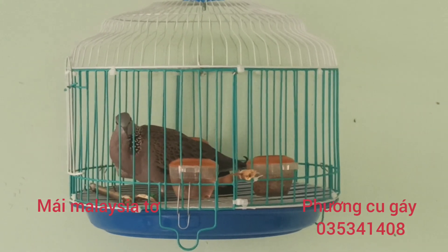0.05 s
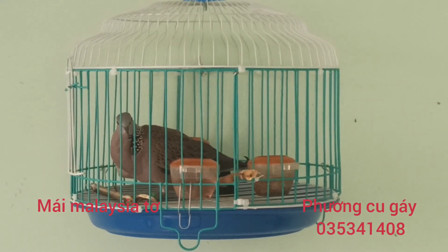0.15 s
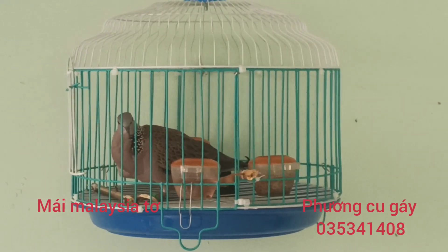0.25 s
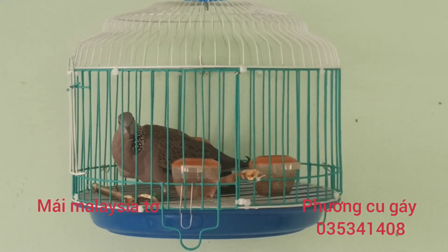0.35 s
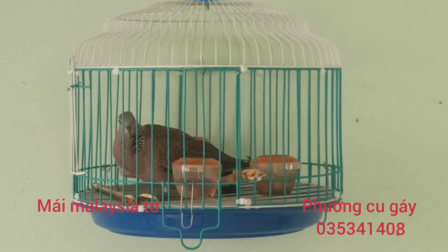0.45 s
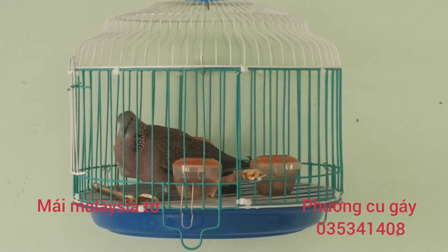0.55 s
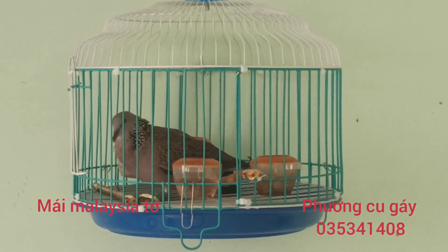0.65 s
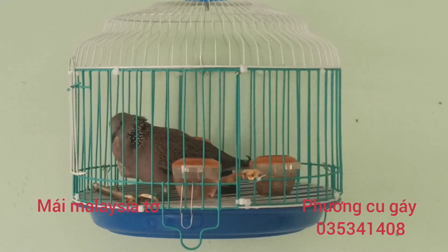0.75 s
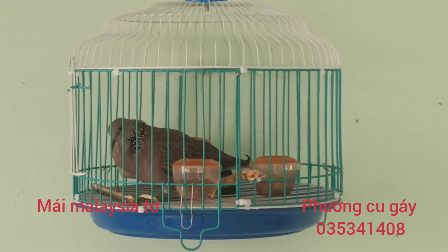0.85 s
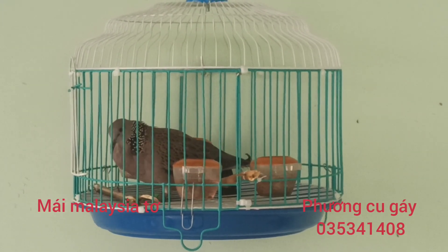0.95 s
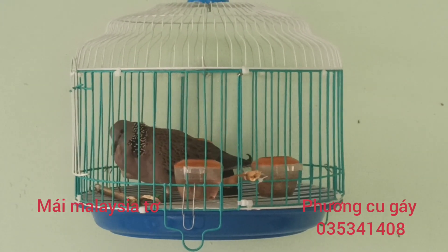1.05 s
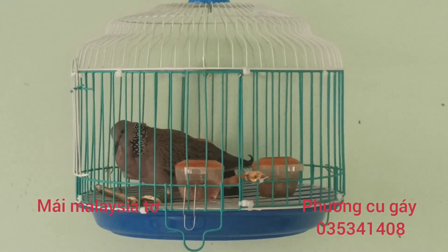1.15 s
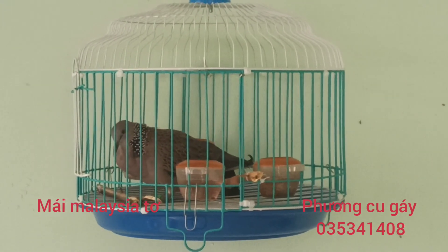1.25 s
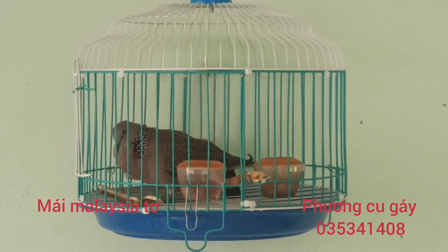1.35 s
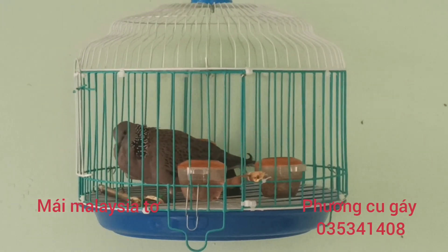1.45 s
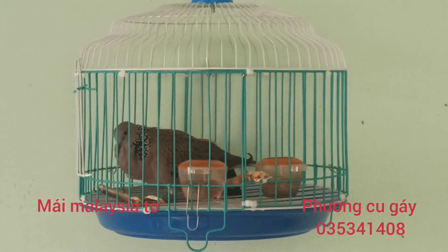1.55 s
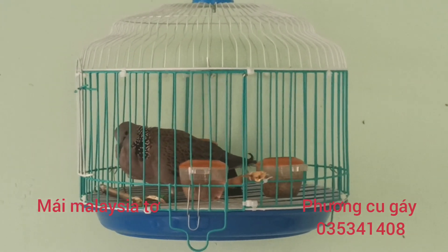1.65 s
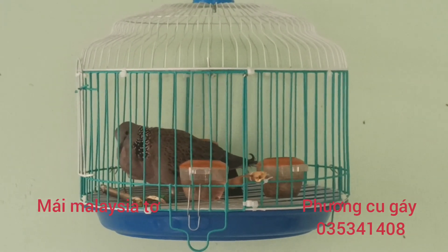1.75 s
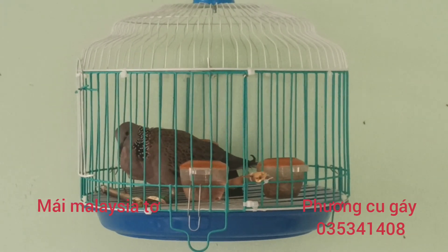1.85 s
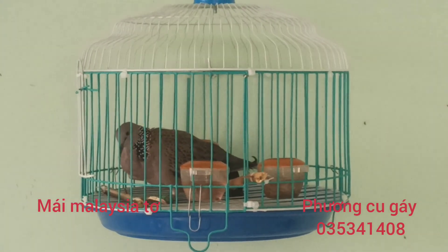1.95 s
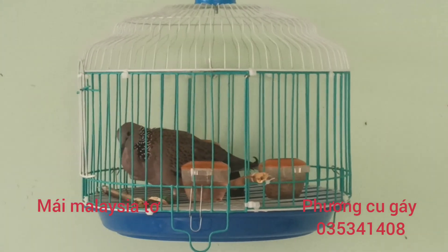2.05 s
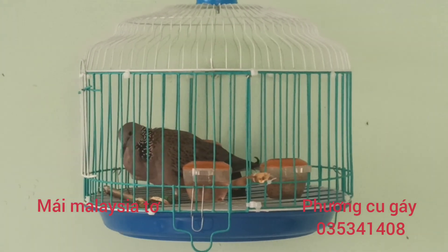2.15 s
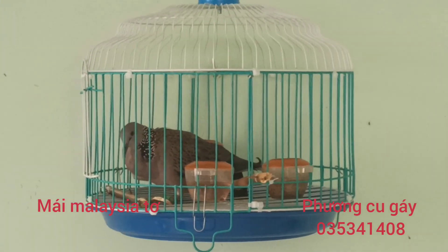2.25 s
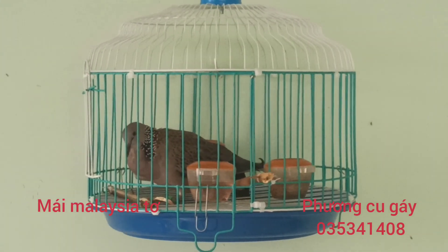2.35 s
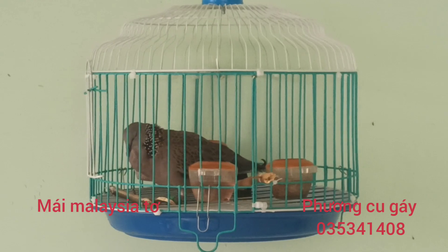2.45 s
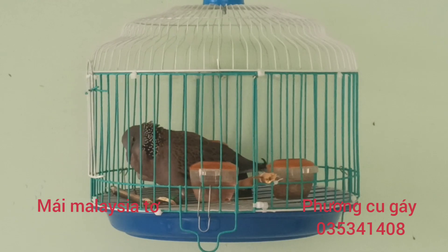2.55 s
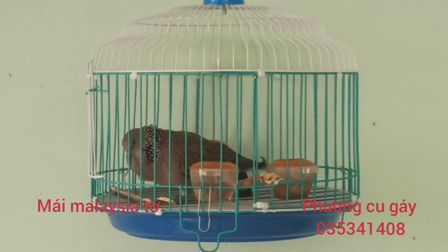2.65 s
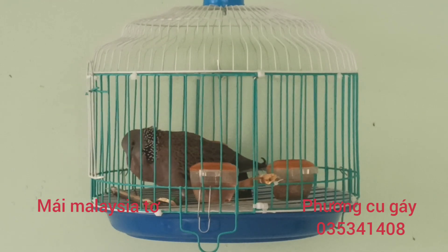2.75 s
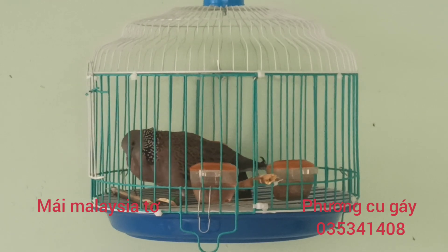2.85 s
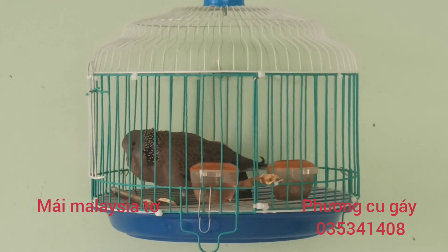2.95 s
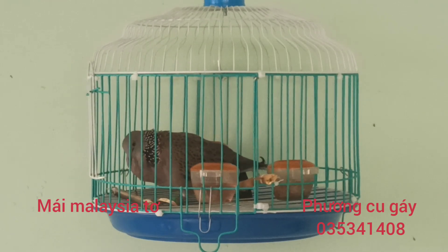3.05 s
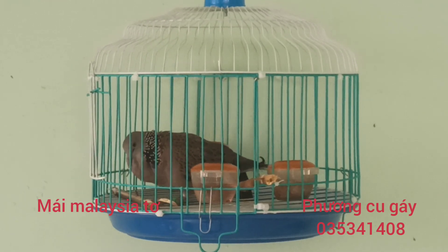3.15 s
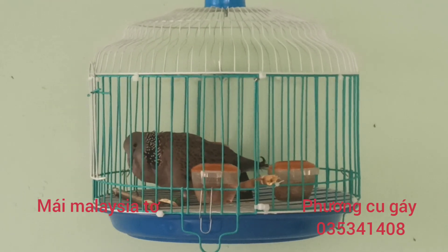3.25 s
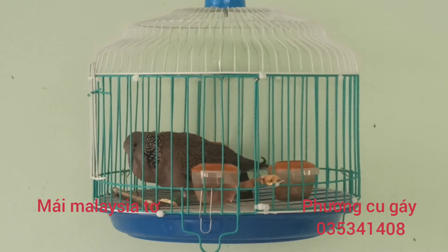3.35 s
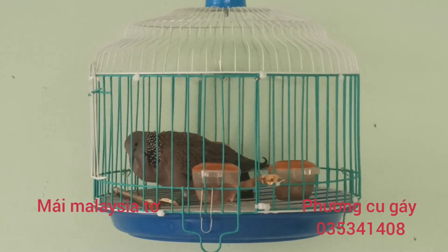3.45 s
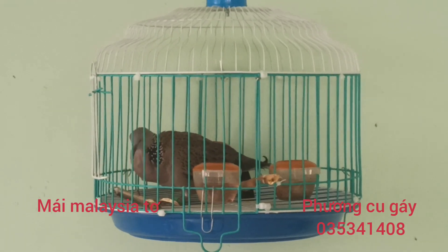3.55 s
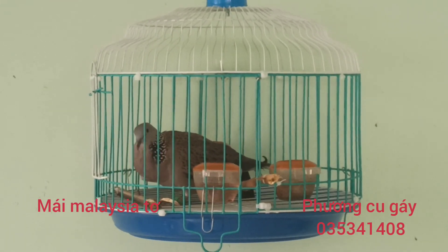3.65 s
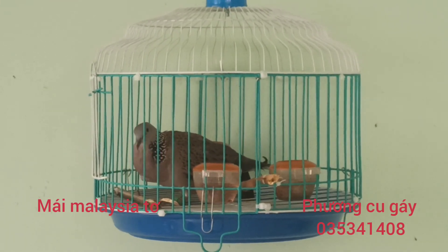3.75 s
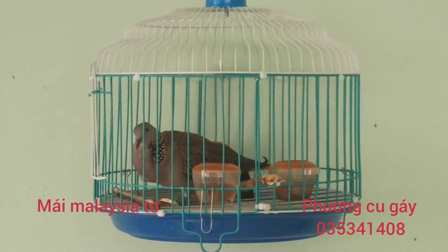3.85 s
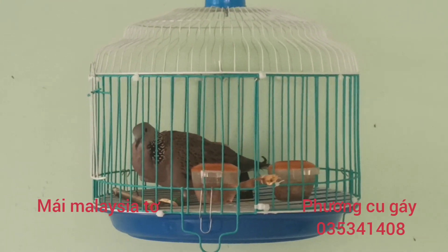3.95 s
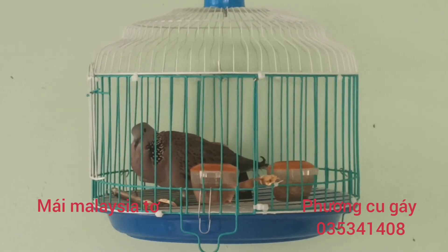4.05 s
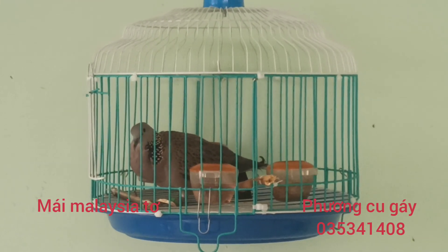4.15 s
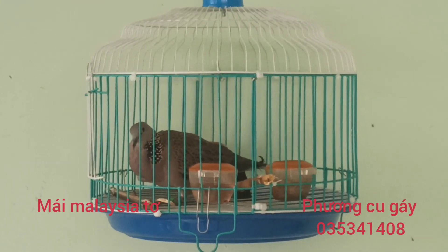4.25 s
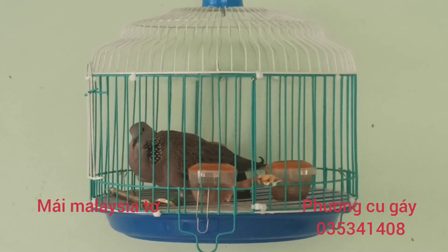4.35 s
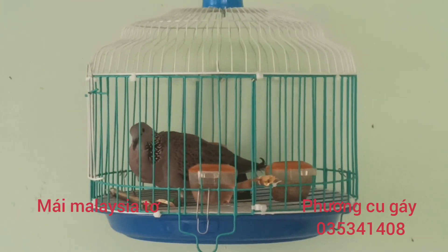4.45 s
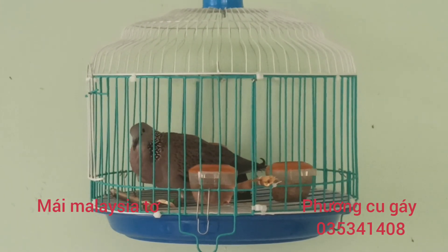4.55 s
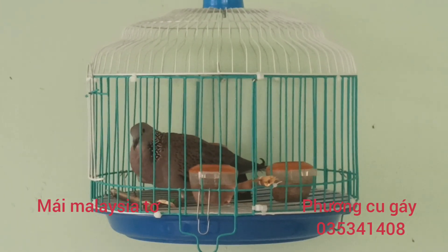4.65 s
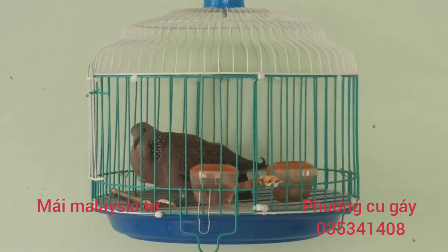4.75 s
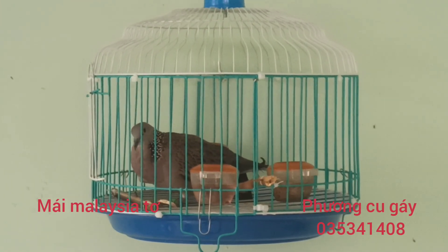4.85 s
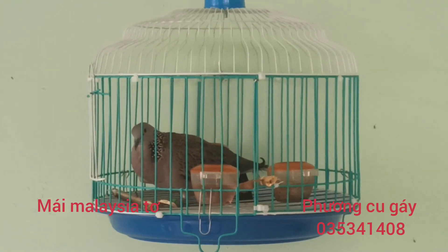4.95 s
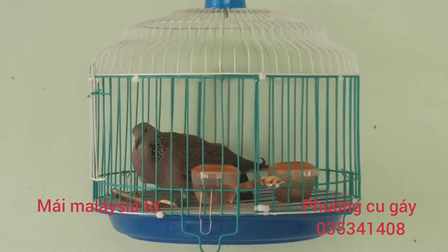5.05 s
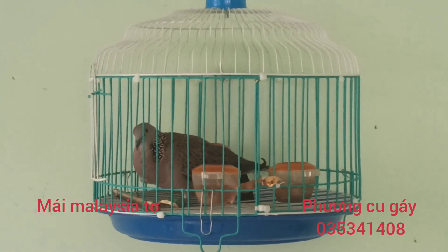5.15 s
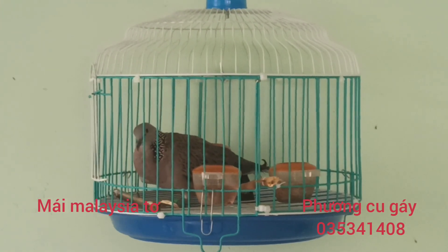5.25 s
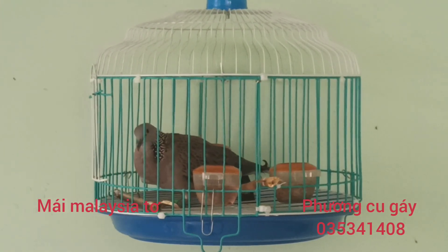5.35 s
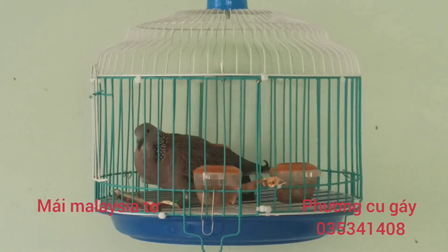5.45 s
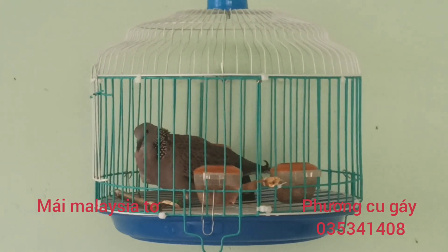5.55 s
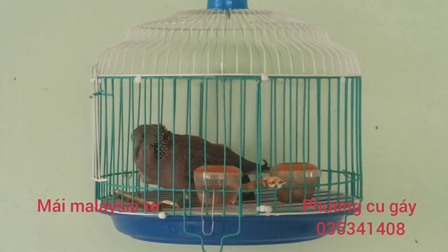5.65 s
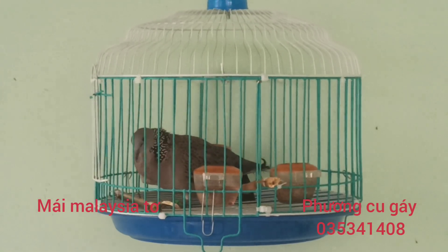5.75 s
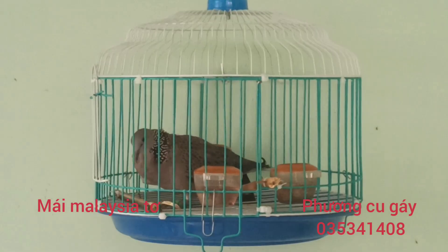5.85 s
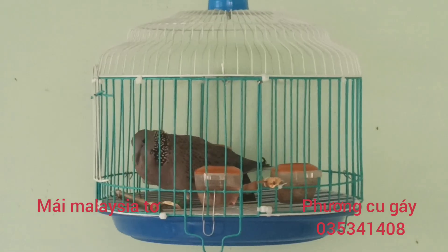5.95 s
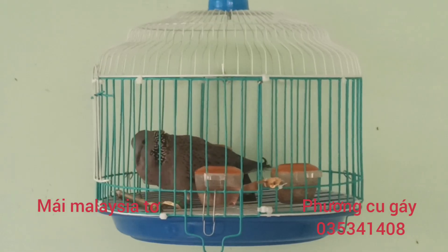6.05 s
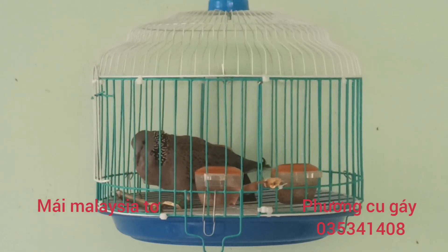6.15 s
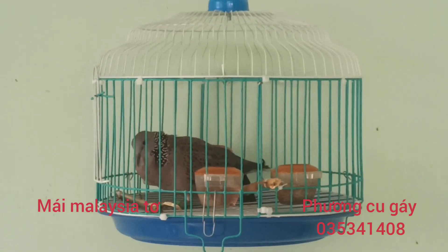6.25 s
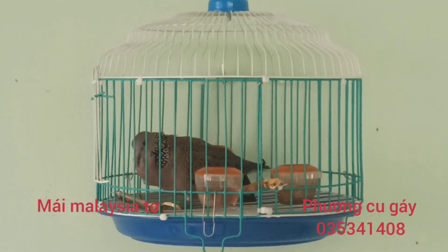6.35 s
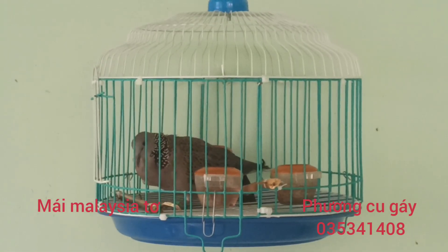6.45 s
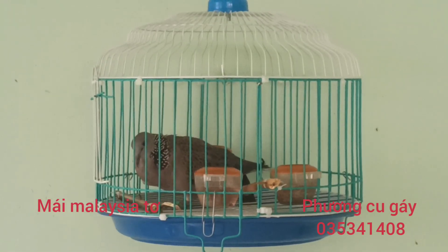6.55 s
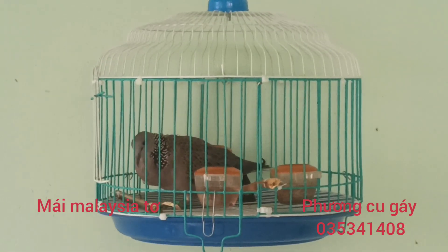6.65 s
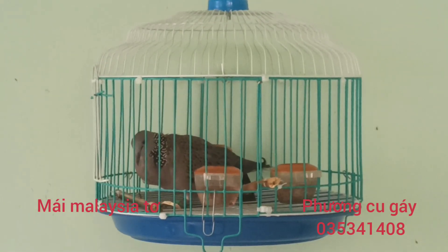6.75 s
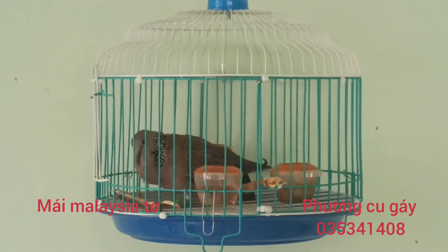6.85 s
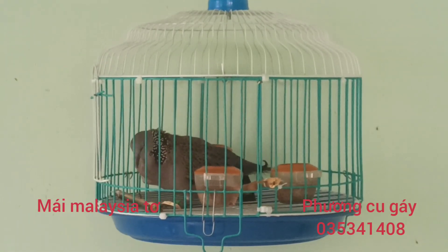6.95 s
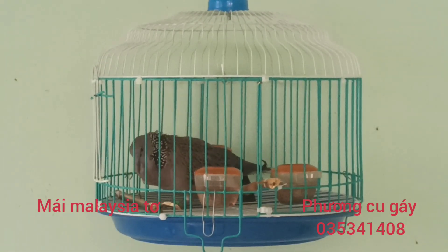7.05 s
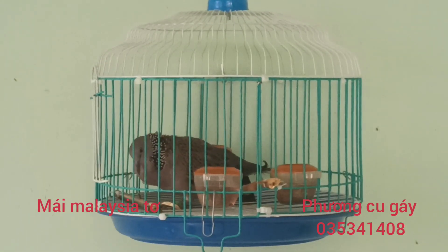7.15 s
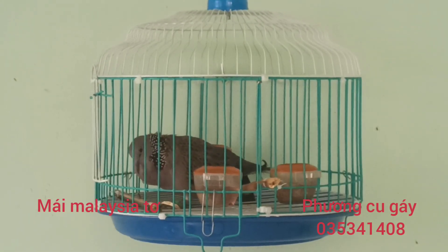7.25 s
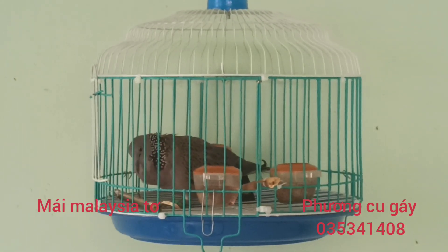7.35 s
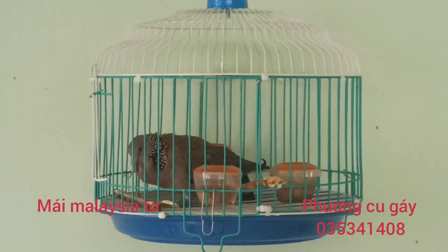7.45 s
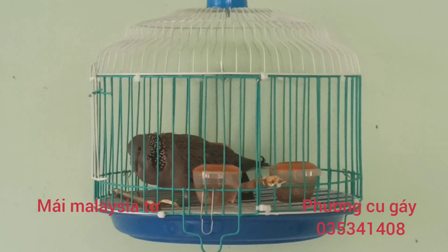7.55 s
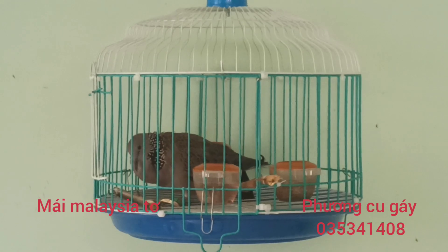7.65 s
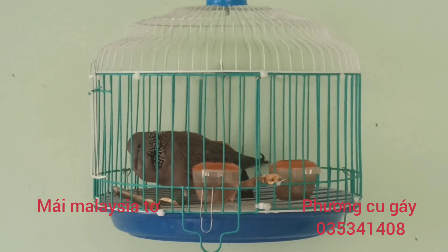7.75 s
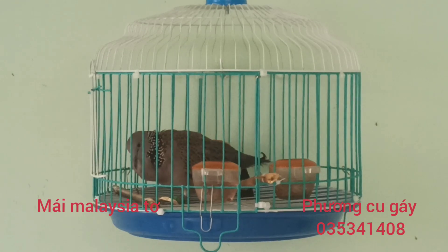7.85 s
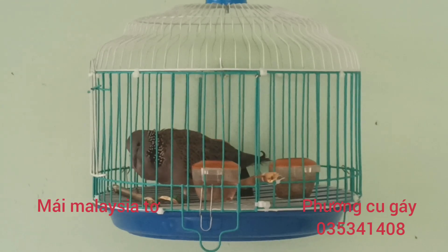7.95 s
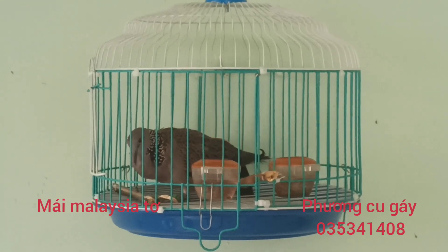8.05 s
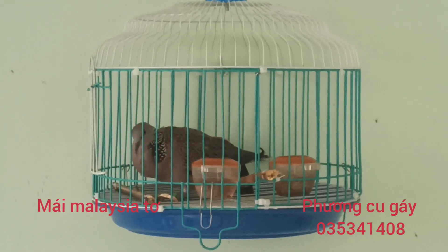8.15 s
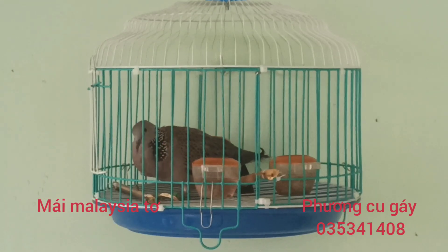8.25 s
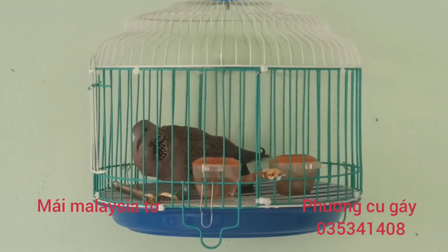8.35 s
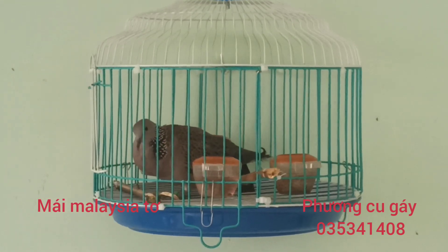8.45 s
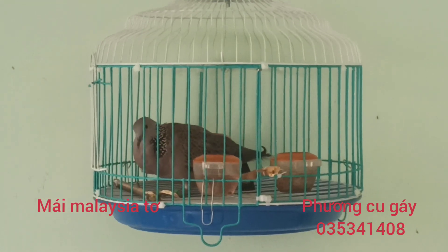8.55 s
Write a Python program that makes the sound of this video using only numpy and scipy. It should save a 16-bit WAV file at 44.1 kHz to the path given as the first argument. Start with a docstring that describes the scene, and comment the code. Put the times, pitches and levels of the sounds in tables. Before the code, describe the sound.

A spotted dove in a wire cage coos four phrases in a bare, quiet room. Each begins with a short plain note, then longer, rapidly fluttering notes that swell and sag. The second ends in a softer, reedier moan. Walls ring briefly after each note. Between calls there are low rumble, faint hiss, soft rustling and a few light ticks on the cage, picked up by a slightly dull microphone.

```python
"""In a bare, quiet room, a caged spotted dove coos four phrases: a short clear note, then longer rolling ones.
Each coo is an almost pure tone that flutters in the syrinx (the bird's voice organ), plus weak overtones and rasp.
One phrase ends in a softer, reedy moan. Faint whistles, a far note and light ticks on the cage are mixed in.
The walls ring on after every note, over a low room rumble, faint hiss and soft rustling made of shaped noise."""
import sys
import numpy as np
from scipy import signal
from scipy.fft import rfft, irfft, next_fast_len
from scipy.io import wavfile
from scipy.ndimage import uniform_filter1d, map_coordinates

SR = 44100
rng = np.random.default_rng(int(sys.argv[2]) if len(sys.argv) > 2 else 0)


def inscribe(sig):
    """Save sig as 16-bit PCM at rate SR to the path in sys.argv[1].

    A 1-D sig is mono; a 2-D sig holds one channel per row.
    Samples are clipped to [-1, 1] before scaling.
    """
    pcm = np.round(np.clip(np.atleast_2d(sig).T, -1, 1) * 32767)
    wavfile.write(sys.argv[1], SR, pcm.astype(np.int16))


N = 378819


def amp(db):
    """Turn decibels into gain."""
    return 10 ** (np.asarray(db) / 20)


def unit(x):
    """Scale x to an rms (average strength) of 1."""
    return x / np.sqrt(np.mean(x ** 2) + 1e-20)


def along(points, hz):
    """Read a curve of (Hz, value) points at any frequency, joining them on a log axis."""
    point_hz, value = np.transpose(points)
    return np.interp(np.log(hz + 1), np.log(point_hz + 1), value)


def wobble(rate):
    """A smooth random curve around 0, with this many random points a second."""
    points = rng.standard_normal(int(N * rate / SR) + 4)
    return map_coordinates(points, [np.arange(N) * rate / SR])


def filtered(x, response):
    """Make each frequency of x louder or softer by response(hz)."""
    size = next_fast_len(N + SR // 2)
    hz = np.fft.rfftfreq(size, 1 / SR)
    return irfft(rfft(x, size) * response(hz), size)[..., :N]


def noise(spectrum):
    """Random noise coloured by a spectrum, at rms 1."""
    white = rng.standard_normal(N)
    return unit(filtered(white, lambda hz: amp(along(spectrum, hz))))


def swells(rows, fall_db_per_s):
    """Gain of a row of noise swells that rise, hold and die away; their powers add."""
    t = np.arange(N) / SR
    power = np.zeros(N)
    for start, rise, hold, level_db in rows:
        before = np.maximum(start - t, 0)
        after = np.maximum(t - start - hold, 0)
        drop_db = 10 * before / rise + fall_db_per_s * after
        near = drop_db < 60  # leave out what is too faint to matter
        power[near] += amp(level_db - drop_db[near]) ** 2
    return np.sqrt(power)


# colour of the low rumble: pitch_hz, relative level_db (per Hz)
RUMBLE_COLOUR = [(20, -57), (35, -31), (50, -22), (90, -3), (125, 1), (200, -1), (300, -3), (500, -7),
                 (800, -12.5), (1400, -32), (3000, -42.5)]
# colour of the hiss: pitch_hz, relative level_db (per Hz)
HISS_COLOUR = [(300, 0.5), (1000, 2), (1600, -1.5), (3000, -4.5), (4500, -5), (7000, -6), (12000, -16.5),
               (15500, -12)]
# swells of the rumble: start_s (of the hold), rise_s (per 10 dB), hold_s, level_db
RUMBLE_SWELLS = [ (0.44, .04, .02, -54), (0.78, .04, .02, -54), (2.39, .035, .07, -53),
                 (2.64, .05, .04, -54.5), (3.02, .05, .02, -57), (3.17, .05, .1, -56), (4.33, .1, .04, -53),
                 (4.63, .06, .06, -56), (4.98, .1, .04, -57), (5.3, .03, .18, -52.5), (5.96, .07, .08, -54),
                 (7.53, .04, .02, -50.5), (7.98, .05, .02, -57), ]
RUMBLE_FALL_DB_PER_S = 85


def background(rumble_db, drift_db, flicker_db, hiss_db):
    """Low noise whose level drifts and flickers, with a few swells, plus steady hiss."""
    restless = amp(rumble_db + drift_db * wobble(4) + flicker_db * wobble(22))
    # hypot adds the powers of the two
    rumble_gain = np.hypot(restless, swells(RUMBLE_SWELLS, RUMBLE_FALL_DB_PER_S))
    return rumble_gain * noise(RUMBLE_COLOUR) + amp(hiss_db) * noise(HISS_COLOUR)


# colour of the rustling, also used by the ticks: pitch_hz, relative level_db (per Hz)
RUSTLE_COLOUR = [(200, -5), (700, 3.5), (1400, -0.5), (2500, 0), (4200, 0), (5500, 1.5), (7200, 2.5),
                 (8500, -3), (12000, -11.5), (15500, -11)]
# rustles: start_s (of the hold), rise_s (per 10 dB), hold_s, level_db (before the overall level)
RUSTLES = [ (0.18, .1, .02, -65), (0.42, .05, .05, -67), (0.91, .11, .06, -60.5), (1.42, .08, .1, -63),
           (1.68, .08, .03, -72), (2.29, .15, .36, -68.5), (2.88, .11, .14, -58.7), (3.1, .1, .02, -64),
           (3.185, .02, .04, -57), (3.37, .15, .08, -60.5), (3.7, .12, .1, -68), (3.98, .1, .08, -65),
           (4.71, .19, .36, -55.3), (5.32, .04, .06, -60), (5.75, .06, .25, -70.5),
           (6.18, .022, .04, -50.6), (6.63, .1, .02, -60.5), (7.18, .12, .15, -68), (7.55, .18, .12, -64),
           (7.87, .04, .14, -70), (8.42, .12, .04, -58), ]
RUSTLE_FALL_DB_PER_S = 85


def rustle(level_db, grain_db, uneven_db):
    """Soft brushing: noise with fast grain and slower unevenness, rising out of the hiss."""
    texture = amp(grain_db * wobble(400) + uneven_db * wobble(22))
    brushing = unit(noise(RUSTLE_COLOUR) * texture)
    return amp(level_db) * swells(RUSTLES, RUSTLE_FALL_DB_PER_S) * brushing


# light ticks on the cage: start_s, level_db (at the start, before the overall level)
TICKS = [(0.794, -54.5), (1.4174, -52), (3.1853, -40)]


def ticks(t60, level_db):
    """Short dry contacts on the cage: noise that starts at once and drops 60 dB in t60 seconds."""
    t = np.arange(N) / SR
    blows = np.zeros(N)
    for start, db in TICKS:
        blows += amp(db - 60 * np.abs(t - start) / t60) * (t >= start)
    return amp(level_db) * blows * noise(RUSTLE_COLOUR)


# thin, faint whistles: start_s, length_s, first_hz, last_hz, level_db (before the overall level)
WHISTLES = [ (0.05, .69, 1982, 1982, -78), (1.33, .25, 6000, 5850, -68.5), (1.66, .38, 1330, 1312, -72.5),
            (2.2, .11, 6210, 6400, -64.5), (3.68, .34, 6300, 6240, -69.5), (6.36, .2, 5900, 5800, -68.5),
            (7.2, .35, 6300, 6110, -71.5), (8.34, .07, 4350, 4250, -67), (8.35, .07, 5440, 5360, -61.5), ]
# a faint falling note from farther off: same columns as the whistles
FAR_NOTES = [(0.23, .08, 795, 715, -58)]


def thin_tones(notes, waver, edge_s, flicker_db, level_db):
    """Faint gliding sine tones; the higher they are, the airier (less steady) their pitch."""
    t = np.arange(N) / SR
    highest = np.max(np.array(notes)[:, 2])
    sound = np.zeros(N)
    for start, length, first, last, db in notes:
        end = start + length
        near = (t > start - edge_s) & (t < end + edge_s)
        gate = np.interp(t[near], [start - edge_s, start, end, end + edge_s], [0, 1, 1, 0])
        unsteady = 1 + waver * (first / highest) ** 2 * wobble(500)[near]
        pitch = np.interp(t[near], [start, end], [first, last]) * unsteady
        sound[near] += amp(db) * gate * np.sin(2 * np.pi * np.cumsum(pitch) / SR)
    return amp(level_db + flicker_db * wobble(25)) * sound


# the dove's notes in four phrases, with faint soft tones before and after
# (the one at 7.85 s stands for the room ringing on):
# start_s, swell_s, hold_s, fade_s, level_db (before surges and the overall level),
# first_hz, top_hz, last_hz (before the slides), droop (share of pitch, 0-1),
# flutter depth (0-1), overtones_db (re the tone, at the start of the note)
NOTES = [ (0.0, .01, .005, .17, -42.5, 500, 494, 455, 0, .7, -26),
         (0.816, .025, .015, .06, -25.8, 540, 546, 524, .2, .28, -33),
         (0.995, .11, .03, .11, -27.3, 525, 578, 582, .08, .63, -37),
         (1.31, .085, .125, .23, -21, 592, 658, 528, .05, .8, -42),
         (2.604, .03, .035, .07, -24.2, 558, 580, 554, .2, .36, -36),
         (2.917, .08, .19, .25, -24.2, 574, 634, 515, .2, .88, -35),
         (3.455, .03, .035, .11, -32.8, 560, 585, 574, .03, .25, -14.5),
         (3.698, .09, .27, .2, -31, 596, 616, 482, .08, .62, -17.5),
         (5.705, .028, .025, .06, -25.3, 542, 546, 528, .19, .2, -36),
         (5.892, .09, .025, .115, -26, 535, 581, 574, .06, .65, -47),
         (6.196, .065, .19, .22, -20.8, 595, 652, 532, .05, .82, -52),
         (7.042, .025, .05, .11, -26.2, 586, 588, 548, .18, .78, -42),
         (7.337, .03, .23, .07, -23.2, 590, 634, 592, 0, .85, -43),
         (7.85, .04, .03, .02, -52, 582, 584, 582, 0, .1, -46),
         (8.23, .09, .06, .07, -48.5, 500, 518, 494, .03, .25, -46), ]
# at the height of two coos the flutter settles into a firm tone: middle_s, half_length_s, gain_db
SURGES = [(3.162, .04, 4.8), (7.585, .05, 3.5)]
SURGE_CALM = .6  # share of the flutter that a surge smooths away
ATTACK_S, RELEASE_S = .012, .019
SWELL_DB_PER_S, FADE_DB_PER_S = 68, 66  # growth during the swell, drop after the hold
SCOOP, SCOOP_S = .15, .01  # a note starts this share flat and slides up; time constant
DROOP_S = .024  # time constant of the final droop, as the pressure fails
SAG_CURVE = 1.3  # above 1, the pitch sinks ever faster towards the end
FLUTTER_BUILD_S = .026  # time constant: the flutter sets in after a clean start
REED_FADE_DB_PER_S = 18  # the voice mellows through a note


def phrasing():
    """Pitch, loudness, flutter, reediness: a note moves to its top pitch as it swells, holds, sags and fades."""
    t = np.arange(N) / SR
    notes = np.array(NOTES)
    current = np.maximum(np.searchsorted(notes[:, 0], t, side="right") - 1, 0)
    start, swell, hold, fade, level_db, first, top, last, droop, depth, reed_db = notes.T[:, current]
    age = np.maximum(t - start, 0)
    left = np.maximum(swell + hold + fade + RELEASE_S - age, 0)
    gate = np.clip(age / ATTACK_S, 0, 1) * np.clip(left / RELEASE_S, 0, 1)

    rising = np.clip(1 - age / swell, 0, 1)  # 1 at the start, 0 once at the top pitch
    sagging = np.clip((age - swell) / (hold + fade), 0, 1) ** SAG_CURVE
    slack = SCOOP * np.exp(-age / SCOOP_S) + droop * np.exp(-left / DROOP_S)
    pitch = (top + (first - top) * rising + (last - top) * sagging) * (1 - slack)

    fading_s = np.maximum(age - swell - hold, 0)
    level_db = level_db - SWELL_DB_PER_S * swell * rising - FADE_DB_PER_S * fading_s
    roll = depth * (1 - np.exp(-age / FLUTTER_BUILD_S))
    for middle, half_length, gain_db in SURGES:
        surge = np.exp(-((t - middle) / half_length) ** 2)
        level_db = level_db + gain_db * surge
        roll = roll * (1 - SURGE_CALM * surge)
    loudness = uniform_filter1d(amp(level_db) * gate, size=300)  # round off the corners
    reed = amp(reed_db - REED_FADE_DB_PER_S * age)
    return pitch, loudness, np.clip(roll, 0, 1), reed


# overtones: multiple of the main pitch, relative level_db
OVERTONES = [(2, -4.5), (3, -14.2), (4, -24), (5, -28.5)]
# colour of the rasp around the tone: pitch_hz, relative level_db (per Hz)
RASP_COLOUR = [(200, -31.5), (330, -14.5), (450, 6.5), (650, 7), (880, 2), (1100, -14.5), (1400, -32.5),
               (2500, -31), (5000, -49.5)]
# the resonance of the inflated throat: pitch_hz, gain_db
THROAT = [(300, -16), (400, 5), (480, -1), (600, -1), (690, 3), (740, -2.5), (800, -12.5), (1000, -18)]


def dove(flutter_hz, swing, rasp_db, growl_db, tone_db, crackle_db):
    """A near-sine from the syrinx, chopped and bent by a fast uneven flutter."""
    pitch, loudness, roll, reed = phrasing()
    flutter = 2 * np.pi * np.cumsum(flutter_hz * (1 + .25 * wobble(70))) / SR
    # each flutter pulse swells the tone and pulls its pitch along
    depth = roll * np.clip(.85 + .3 * wobble(30), 0, 1.2)
    swell = (1 + depth * np.cos(flutter)) / np.sqrt(1 + depth ** 2 / 2)  # keeps the average power
    bend = roll ** 2 * swing * np.sin(flutter)
    jitter = (.007 + .04 * roll ** 2) * wobble(110)
    phase = 2 * np.pi * np.cumsum(pitch * (1 + bend + jitter)) / SR

    # the throat carries the fundamental; only weak overtones leak past it
    tone = filtered(loudness * swell * np.sin(phase), lambda hz: amp(along(THROAT, hz)))
    crackle = amp(crackle_db * (wobble(60) - 1))
    stack = sum(amp(db) * np.sin(round(multiple) * phase) for multiple, db in OVERTONES)
    overtones = reed * crackle * stack

    # flutter roughens the voice, most of all when it is reedy
    rasp_gain = amp(rasp_db) * (roll + 0.48) + amp(growl_db) * roll * np.sqrt(reed)
    rasp = rasp_gain * noise(RASP_COLOUR)
    return amp(tone_db) * (tone + loudness * swell * (overtones + rasp))


# how long the walls ring: pitch_hz, t60_s (time to drop 60 dB)
WALLS = [(150, 0.29), (600, 0.54), (2000, 0.44), (10000, 0.37)]
# resonances of the room that the coos sweep through: centre_hz, width_hz, level_db
ROOM_MODES = [(591, 10, -12), (672, 10, -4)]


def room(x, wet_db):
    """Direct sound, the room's resonances and the walls' answer, each frequency dying at its own speed."""
    hz, t, grains = signal.stft(rng.standard_normal(SR), SR, nperseg=256)
    dying = amp(-60 * t / along(WALLS, hz)[:, None])
    tail = signal.istft(grains * dying, SR, nperseg=256)[1]
    tail = np.pad(tail / np.linalg.norm(tail), (round(.012 * SR), 0))  # the walls answer 12 ms late

    def modes(f):
        """Response of the resonances, each strongest at its centre."""
        total = 0
        for centre, width, db in ROOM_MODES:
            damping = 1j * f * width
            total = total + amp(db) * damping / (centre ** 2 - f ** 2 + damping)
        return total

    return x + filtered(x, modes) + amp(wet_db) * signal.fftconvolve(x, tail)[:N]


def scene():
    """The dove, ticks and thin tones ring in the room; rustling and background are added dry."""
    floor = background(rumble_db=-60, drift_db=.8, flicker_db=1.5, hiss_db=-67.4)
    brushing = rustle(level_db=1.66, grain_db=1.2, uneven_db=1.0)
    taps = ticks(t60=.03, level_db=-4.5)
    whistles = thin_tones(WHISTLES, waver=.023, edge_s=.025, flicker_db=3, level_db=-1.5)
    far_note = thin_tones(FAR_NOTES, waver=.035, edge_s=.025, flicker_db=2, level_db=0)
    voice = dove(flutter_hz=72.9, swing=0.057, rasp_db=-33, growl_db=-.5, tone_db=1.5, crackle_db=2.2)
    sound = room(voice + far_note + whistles + taps, wet_db=-3.8)
    return (sound + brushing + floor)[None]


# dips in the microphone's response: low_hz, high_hz, gain_db
MIC_DIPS = [(4730, 6100, -8), (8510, 11600, -16)]
TOP_HZ = 15600  # nothing passes from here up


def record(dry):
    """The microphone has two dips in the treble and a steep band limit."""
    def response(hz):
        """Gain of the microphone at each frequency."""
        dips_db = sum(db * ((hz > low) & (hz < high)) for low, high, db in MIC_DIPS)
        return amp(dips_db) * (hz < TOP_HZ)

    return filtered(dry, response)


dry = scene()
out = record(dry)
inscribe(out)
```